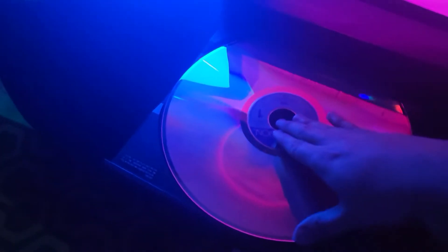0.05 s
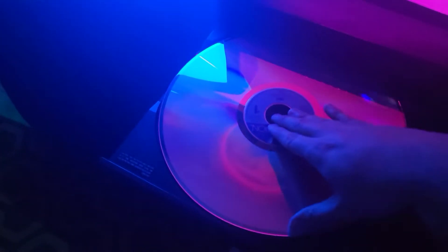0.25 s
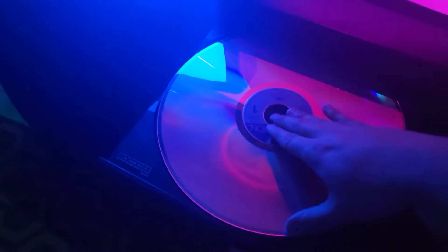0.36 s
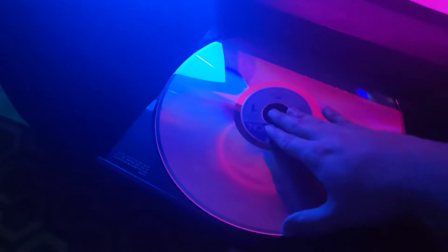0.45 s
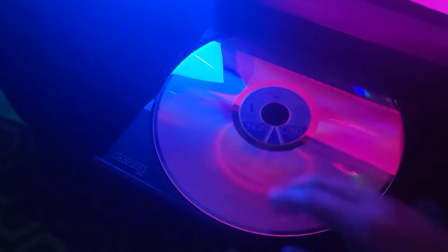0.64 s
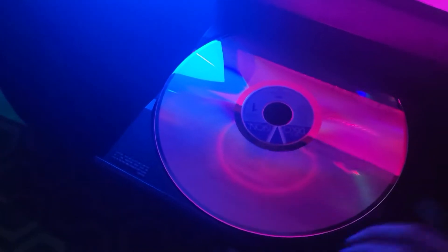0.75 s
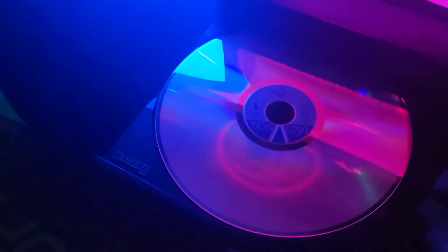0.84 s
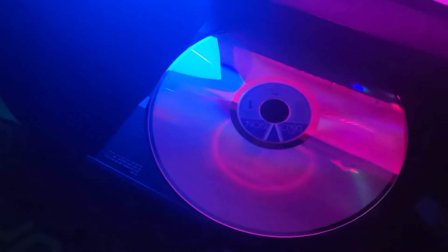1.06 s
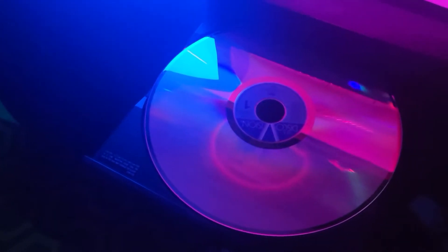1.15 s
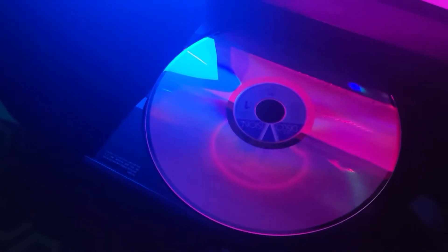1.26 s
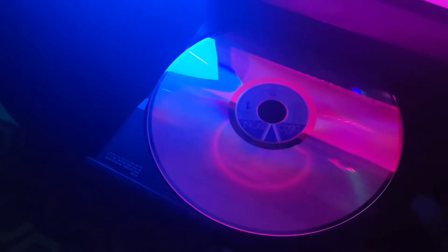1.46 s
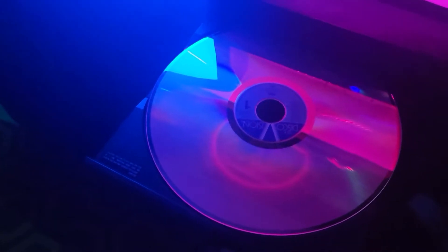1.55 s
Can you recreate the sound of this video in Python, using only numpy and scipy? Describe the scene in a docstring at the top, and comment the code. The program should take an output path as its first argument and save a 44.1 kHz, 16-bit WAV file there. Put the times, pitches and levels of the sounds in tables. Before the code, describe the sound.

A large plastic disc snaps onto a player's hub with one sharp click, over faint hum.

```python
"""A machine's fan hums, a picture tube whines and throbs high above, and a hand rustles faintly.
At 0.2 s a large plastic disc is pressed onto a player's hub and rubs, squeaking, over its catches.
At 0.26 s it snaps home: it cracks, rings briefly and shakes the tray, and a small room answers.
Fan and whine carry on under a few dull handling bumps and, near the end, one tiny chirp."""
import sys
import numpy as np
from scipy import signal
from scipy.fft import rfft, irfft, next_fast_len
from scipy.io import wavfile
from scipy.ndimage import map_coordinates

SR = 44100
rng = np.random.default_rng(int(sys.argv[2]) if len(sys.argv) > 2 else 0)


def wav_record(signal):
    """Record a signal, one row per channel, as 16-bit PCM in the file named by sys.argv[1]."""
    frames = np.transpose(np.atleast_2d(signal))
    bounded = np.clip(frames, -1, 1)
    # unit amplitude maps onto the largest positive 16-bit level
    quanta = np.round(bounded * 32767).astype(np.int16)
    wavfile.write(sys.argv[1], SR, quanta)


N = 70560  # 1.6 s

# Contacts as the disc seats: start_s, level_db, crack_gain_db
SNAPS = [(.2265, -41.5, -4.5), (0.2617, -29, 6), (.2630, -24, -1), (.2670, -25, -9), (.2795, -37.5, -6.5)]
# EQ of the crack: freq_hz, gain_db
CRACK_EQ = [(200, -17.5), (900, -1.5), (2000, 4.5), (3000, 1.5), (5000, -10), (7500, -1.5), (9500, -14.5),
            (14000, -9), (16000, -32)]
# The disc's strong modes: pitch_hz, gain_db, t60_s
DISC_MODES = [(498, -9.5, 0.13), (684.7, -14.5, 0.071), (956, -8.5, 0.04), (1167.5, -4, 0.036),
              (1222, -2.5, 0.045), (1554, -15.5, 0.14), (1825, -19, 0.32), (1999, -5, .05),
              (2223, -5, .045), (2380, -5, 0.073), (3700, -16, .06), (4550, -21, 0.062), (5270, -16, 0.037),
              (7640, -14.5, 0.031)]
# Its many weak modes, played as a wash of noise: freq_hz, gain_db
WASH_EQ = [(100, -5), (300, -3.5), (650, -4), (1100, -2.5), (2100, 8), (2900, -2), (4000, 0), (7500, -11),
           (9500, -13), (15000, -23)]
# Decay of that wash: freq_hz, t60_s
WASH_DECAY = [(200, 0.18), (1500, 0.05), (5000, .075), (14000, 0.12)]
# Stereo image of the disc's noises: freq_hz, correlation
DISC_IMAGE = [(100, .97), (500, 0.79), (1500, 0.53), (5000, 0.17), (14000, 0.13)]

def disc_snaps():
    """Each contact with the hub cracks and sets the disc ringing briefly."""
    attack_s = 0.00027
    out = np.zeros((2, N))
    for start, level_db, crack_db in SNAPS:
        t = since(start)
        crack = noise(CRACK_EQ, DISC_IMAGE) * struck(t, attack_s, t60_s=0.016)
        wash = damped(noise(WASH_EQ, DISC_IMAGE), start, WASH_DECAY) * rise(t, attack_s)
        modes = ring(DISC_MODES, t, attack_s)
        out += amp(level_db) * (amp(crack_db) * crack + amp(-4.5) * wash + amp(-4) * modes)
    return out


# Strokes over the catches: start_s, length_s, level_db, squeak_gain_db, squeak_hz
RUBS = [(0.2026, 0.009, -56, 8, 1390), (0.22, 0.0091, -44.5, 5, 1350), (0.2344, 0.023, -49, -3.5, 2360),
        (0.2532, 0.0037, -41, -4, 998.6)]
# EQ of the scrape: freq_hz, gain_db
SCRAPE_EQ = [(60, -26), (250, 3), (500, 4.5), (800, -7), (1150, -4), (1800, -7), (2400, -1.5), (3200, -9.5),
             (5200, -10), (9000, -29.5), (15000, -31)]

def disc_rubs():
    """Tiny slips scrape the hub; the rim squeaks with the wavering tone of slips falling into step."""
    slips_per_s, scatter_db, pitch_wander = 2500, 4, 0.079
    out = np.zeros((2, N))
    for start, length, level_db, squeak_db, squeak_hz in RUBS:
        slips = (rng.random((2, N)) < slips_per_s / SR) * rng.choice([-1, 1], (2, N))
        slips = slips * amp(scatter_db * rng.standard_normal((2, N)))
        scrape = stereo(slips, SCRAPE_EQ, DISC_IMAGE)
        pitch_hz = squeak_hz * (1 + pitch_wander * wobble(400))
        squeak = unit(np.sin(2 * np.pi * np.cumsum(pitch_hz) / SR))
        stroke = rise(since(start), attack_s=0.0017) * decay(since(start + length), t60_s=0.043)
        out += amp(level_db) * stroke * (scrape + amp(squeak_db) * squeak)
    return out


# Pushes on the tray: start_s, level_db, cutoff_hz
THUDS = [(0.2239, -53, 400), (0.2604, -39, 357), (0.2789, -45.5, 330), (.309, -47, 150)]
# The tray's modes: pitch_hz, gain_db, t60_s
TRAY_MODES = [(57, -6.5, 0.16), (125.4, -6, 0.18), (157.4, -5.5, 0.18), (211.4, -1.5, 0.18),
              (248, -1.5, 0.16), (272, 2.5, 0.1)]

def tray_thuds():
    """The tray gives under the hand with short, low thuds, each duller than the one before."""
    out = np.zeros(N)
    for start, level_db, cutoff_hz in THUDS:
        modes = ring(TRAY_MODES, since(start), attack_s=0.0026)
        lowpass = lambda hz: 1 / (1 + 1j * np.sqrt(2) * hz / cutoff_hz - (hz / cutoff_hz) ** 2)
        out += amp(level_db) * filtered(modes, lowpass)
    return out


# Panning of disc and tray: freq_hz, left_over_right_db
PLAYER_PAN = [(60, -1.5), (200, -3), (380, -3.5), (700, 1.5), (1300, 0), (2300, -3.5), (4400, -2),
              (8000, -0.2), (15000, -1.5)]

def placed_right(x):
    """The player sits a little to the right: the left ear hears it later and mostly softer."""
    left_lag_s = 0.00015
    lag = lambda hz: np.exp(-2j * np.pi * hz * left_lag_s * SIDES)
    return filtered(x, lambda hz: pan(along(PLAYER_PAN, hz)) * lag(hz))


# Reverb time: freq_hz, t60_s
ROOM_DECAY = [(100, 0.56), (300, 0.55), (900, 0.35), (2000, 0.35), (5000, 0.33), (9000, 0.25), (15000, .17)]
# Reverb EQ: freq_hz, gain_db
ROOM_EQ = [(80, -3.5), (250, -3.5), (900, -5.5), (2000, -2), (4000, -2.5), (8000, -2.5), (15000, 5)]
# Stereo image of the reverb: freq_hz, correlation
ROOM_IMAGE = [(100, 1), (400, .6), (1200, 0.0015), (10000, 0.42)]

def room(x):
    """A small room's diffuse answer; from each snap on, the sound feeds a fresh noise tail."""
    predelay_s, crossfade_s = 0.0051, 0.001
    build_up = rise(since(predelay_s), attack_s=0.0049)
    edges = [0, *(start for start, _, _ in SNAPS), N / SR]
    gates = [np.clip(since(edge) / crossfade_s, 0, 1) for edge in edges]
    out = np.zeros((2, N))
    for opens, closes in zip(gates, gates[1:]):
        tail = damped(noise(ROOM_EQ, ROOM_IMAGE), 0, ROOM_DECAY) * build_up
        tail /= np.linalg.norm(tail[0])
        out += signal.fftconvolve(x * (opens - closes), tail, axes=1)[:, :N]
    return out


# Fader curve of the hand's rustle: time_s, level_db
RUSTLE_FADER = [(0, -77), (.03, -74), (.11, -79.5), (.155, -73), (.22, -71.5), (.55, -79), (.8, -78),
                (.88, -90), (1.03, -98), (1.1, -78), (1.2, -84), (1.29, -77), (1.45, -88), (1.6, -83.5)]
# EQ of the rustle: freq_hz, gain_db
RUSTLE_EQ = [(200, -8), (1300, 0.5), (2500, -4.5), (5200, -8.5), (8000, -12), (14000, -17.5)]
# Stereo image of the rustle: freq_hz, correlation
RUSTLE_IMAGE = [(200, .6), (3000, 0.19)]
# Dull handling bumps: peak_s, half_width_s, level_db
BUMPS = [(.09, 0.055, -62.5), (0.251, 0.011, -50.5), (.405, 0.021, -63), (0.591, 0.026, -63.5),
         (1.41, 0.031, -62.5)]
# Bass-heavy EQ of the bumps: freq_hz, gain_db
BUMP_EQ = [(20, -7), (50, -5), (80, -2.5), (120, -15.5), (300, -37.5), (2000, -100)]

def handling():
    """The moving hand: faint rustle, dull bumps and one tiny chirp."""
    t = since(0)
    rustle_db = np.interp(t, *np.transpose(RUSTLE_FADER)) + 1.5 * wobble(74)
    rustle = amp(rustle_db) * noise(RUSTLE_EQ, RUSTLE_IMAGE)
    bump_envelope = sum(amp(db) * swell(peak, half_width) for peak, half_width, db in BUMPS)
    bumps = bump_envelope * noise(BUMP_EQ, BACKGROUND_IMAGE)
    chirp_tone = unit(np.sin(2 * np.pi * 1690 * t + 0.5 * wobble(150)))
    chirp = amp(-71) * swell(peak_s=1.515, half_width_s=0.011) * chirp_tone
    return rustle + pan(-2.5) * bumps + chirp


# Drift of the whine: time_s, level_db, left_over_right_db, left_phase_lead_rad
WHINE_DRIFT = [(0, -55, -9, 2.2), (.2, -49, -7, 1.1), (.45, -48, -3, 0.21), (0.679, -46, 1, 0.45),
               (.82, -47, -3, 0.8), (.95, -56.5, 7.5, 0.95), (1.101, -53.5, -2, 0.53),
               (1.22, -58.5, 10.5, 1.8), (1.35, -68, 4, 4), (1.6, -52.5, -2, 2.65)]

def tube_whine():
    """A picture tube's thin line tone throbs and drifts between the ears."""
    pitch_hz = 15735
    throb_hz, throb_depth, throb_peak_s = 12.75, 0.5, 0.603
    t = since(0)
    times, *curves = np.transpose(WHINE_DRIFT)
    level_db, pan_db, phase_lead = (np.interp(t, times, curve) for curve in curves)
    throb = 1 + throb_depth * np.cos(2 * np.pi * throb_hz * (t - throb_peak_s))
    tone = np.sin(2 * np.pi * pitch_hz * t + SIDES * phase_lead)
    return amp(level_db) * pan(pan_db) * unit(throb * tone)


# EQ of the fan's air noise: freq_hz, gain_db
AIR_EQ = [(20, -8.5), (30, -3.5), (55, -0.5), (80, -3), (120, -11.5), (170, -10.5), (250, -10.5),
          (370, -13), (480, -10), (560, -17), (900, -16), (1700, -23), (3200, -36), (5200, -39),
          (8500, -43.5), (11500, -42), (13000, -33), (14000, -51)]
# Stereo image of the air noise and the handling bumps: freq_hz, correlation
BACKGROUND_IMAGE = [(50, 0.81), (200, 0.71), (600, 0.18), (2000, 0.1), (10000, 0.1)]
# The fan motor's tones: pitch_hz, level_db
MOTOR_TONES = [(251, -76.5), (480.5, -71), (670.5, -77), (960, -83), (9162, -90.5)]

def fan():
    """The fan moves air with a soft rush while its motor hums a few wavering tones."""
    waver_db = 1.5
    hum = np.zeros(N)
    for pitch_hz, level_db in MOTOR_TONES:
        gain = amp(level_db - waver_db * wobble(18))
        hum += gain * unit(np.sin(2 * np.pi * pitch_hz * since(0) + 0.22 * wobble(5)))
    air = amp(-64) * noise(AIR_EQ, BACKGROUND_IMAGE)
    return pan(-1.86) * (air + hum)


def amp(db):
    """Decibels to gain."""
    return 10 ** (np.asarray(db) / 20)


def unit(x):
    """x at rms 1."""
    return x / np.sqrt(np.mean(x ** 2) + 1e-20)


def along(curve, hz):
    """A curve's value at hz, on a log frequency axis."""
    freqs, values = np.transpose(curve)
    return np.interp(np.log(hz + 1), np.log(freqs + 1), values)


def wobble(rate_hz):
    """A smooth random curve through rate_hz points a second."""
    points = rng.standard_normal(int(N * rate_hz / SR) + 4)
    return map_coordinates(points, [np.arange(N) * rate_hz / SR])


def since(start):
    """Seconds since start, zero before it."""
    return np.maximum(np.arange(N) / SR - start, 0)


def rise(t, attack_s):
    """An attack easing from 0 up to 1."""
    return 1 - np.exp(-t / attack_s)


def decay(t, t60_s):
    """A fall of 60 dB every t60_s."""
    return np.exp(-np.log(1000) * t / t60_s)


def struck(t, attack_s, t60_s):
    """A quick rise and an exponential decay."""
    return rise(t, attack_s) * decay(t, t60_s)


def swell(peak_s, half_width_s):
    """A bell-shaped rise and fall."""
    return np.exp(-0.5 * ((since(0) - peak_s) / half_width_s) ** 2)


def ring(modes, t, attack_s):
    """Damped modes, each starting at a random phase."""
    return sum(amp(db) * struck(t, attack_s, t60) * np.sin(2 * np.pi * (hz * t + rng.random()))
               for hz, db, t60 in modes)


def filtered(x, response):
    """x through a complex frequency response."""
    size = next_fast_len(N + SR // 2)
    return irfft(rfft(x, size) * response(np.fft.rfftfreq(size, 1 / SR)), size)[..., :N]


def damped(x, start, t60_curve):
    """From start on, each frequency of x dies at its own speed."""
    hz, t, spectra = signal.stft(x, SR, nperseg=256)
    fade = decay(np.maximum(t - start, 0), along(t60_curve, hz)[:, None])
    return signal.istft(spectra * fade, SR, nperseg=256)[1][:, :N]


SIDES = np.array([[0.5], [-0.5]])  # splits a difference between left and right

def pan(left_over_right_db):
    """Left and right gains."""
    return amp(SIDES * left_over_right_db)


def stereo(pair, eq, image):
    """Two unrelated signals, equalised and blended as mid and side, at rms 1."""
    angle = lambda hz: np.arccos(np.clip(along(image, hz), -1, 1)) / 2
    mid, side = filtered(pair, lambda hz: amp(along(eq, hz)) * [np.cos(angle(hz)), np.sin(angle(hz))])
    return unit(np.array([mid + side, mid - side]))


def noise(eq, image):
    """Coloured stereo noise at rms 1."""
    return stereo(rng.standard_normal((2, N)), eq, image)


def scene():
    """Disc and tray in their room, over the hand, the fan and the picture tube."""
    reverb_db = -8
    player = placed_right(disc_rubs() + disc_snaps() + tray_thuds())
    return player + amp(reverb_db) * room(player) + handling() + fan() + tube_whine()


def record(dry):
    """A brick-wall high cut just above the whine."""
    return filtered(dry, lambda hz: hz < 16200)


dry = scene()
out = record(dry)
wav_record(out)
```